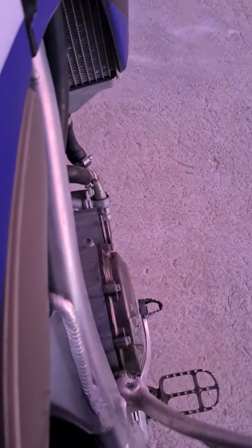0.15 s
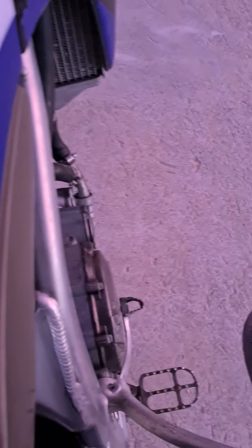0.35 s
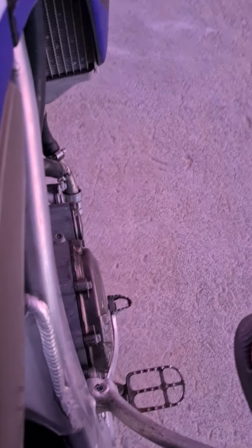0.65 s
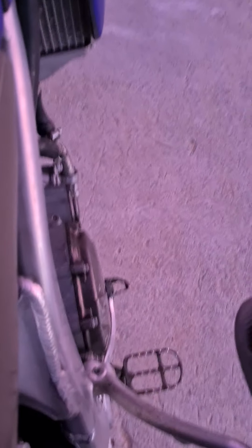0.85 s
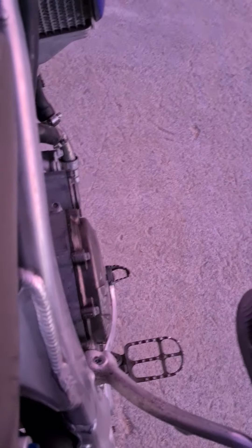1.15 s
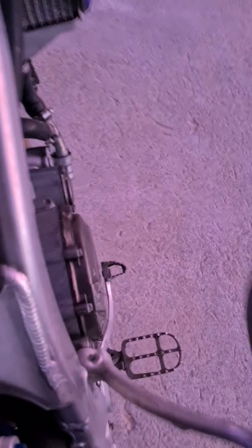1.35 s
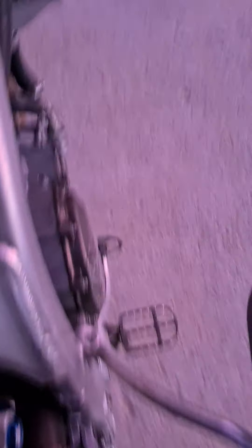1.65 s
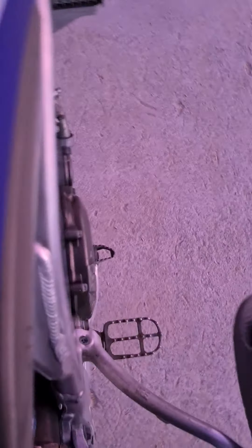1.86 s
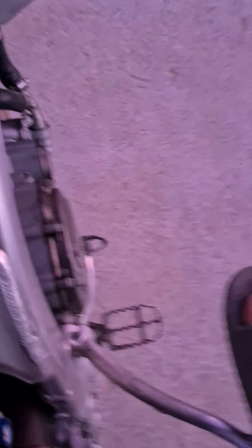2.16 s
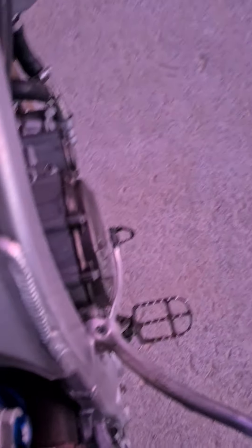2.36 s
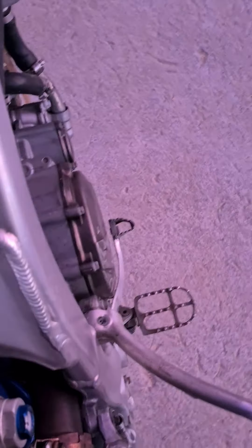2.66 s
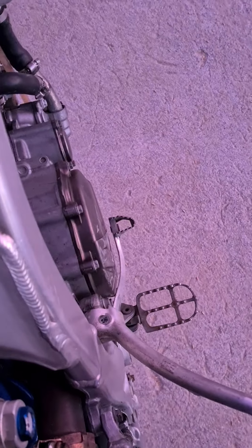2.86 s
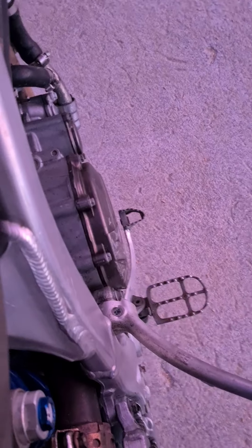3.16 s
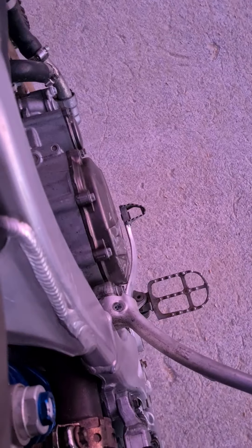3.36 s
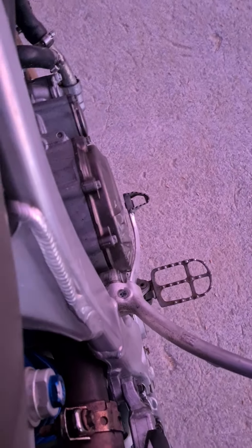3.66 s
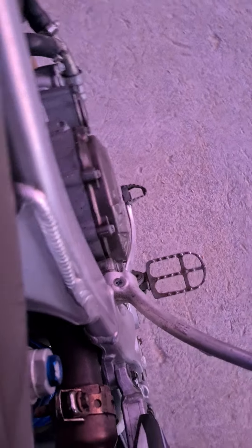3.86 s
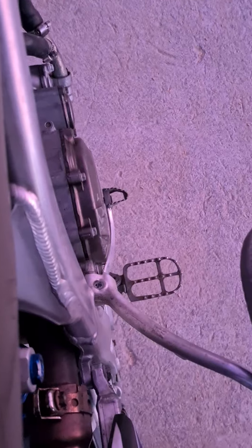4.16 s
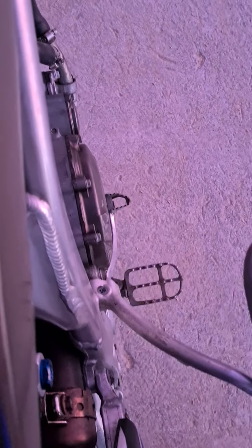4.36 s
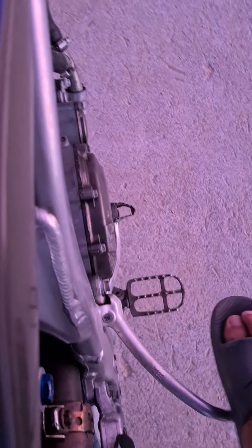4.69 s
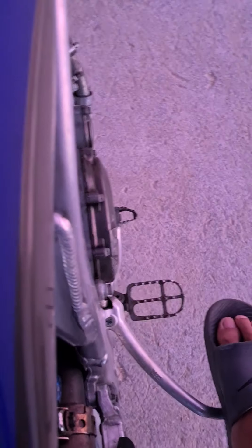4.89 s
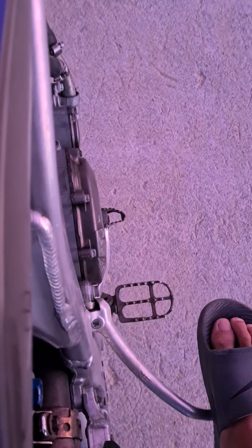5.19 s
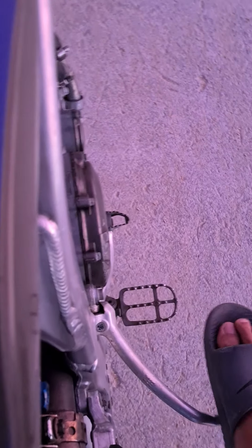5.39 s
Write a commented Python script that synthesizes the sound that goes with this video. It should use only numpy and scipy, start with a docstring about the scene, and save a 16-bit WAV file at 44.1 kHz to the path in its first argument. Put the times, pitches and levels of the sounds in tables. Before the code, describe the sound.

A parked motorcycle's kick-start lever is worked by foot in a quiet concrete yard, its own engine off. At once two very loud, bright metal clacks snap at 0.04 and 0.12 s with tiny squeaks and sharp scraping, then a duller knock with a short thud at 0.23. Faint ticks and a soft scuff run from 0.65 to 1.0. At 1.32 a strong clack lands, with a low thump near 1.4, and gritty dragging and small knocks continue until 1.9. Light rattles come around 2.3, then near quiet. A crisp tick at 3.68 and a short rattle at 3.76 follow. From 4.44 to 4.85 the sole drags dully with a faint lower squeak. Small ticks lead to a squeaky scrape and a hard, bright clack at 5.51. Contacts are dry, close and mostly right of centre; soft distant traffic, thin high insect hiss and a barely audible far engine stay underneath.

```python
"""A foot works the kick-start lever of a parked motorcycle in a concrete yard, its engine off.
Lever pivot and ratchet clack: bursts of tiny touches ring the modes of the cast metal. The sandal scuffs
and drags as filtered random grains, the pivot squeaks as gliding tones, and the frame thuds as damped swings.
Far off, filtered noise makes traffic, insects at one high pitch, a narrow hiss and an idling engine.
The machine stands to the right of two spaced microphones."""
import sys
import numpy as np
from scipy import signal
from scipy.fft import rfft, irfft, next_fast_len
from scipy.io import wavfile
from scipy.ndimage import uniform_filter1d

SR = 44100
rng = np.random.default_rng(int(sys.argv[2]) if len(sys.argv) > 2 else 0)


def int16_out(signal):
    """Quantize to a 16-bit WAV file."""
    q = np.round(np.clip(np.atleast_2d(signal).T, -1, 1) * 32767)
    wavfile.write(sys.argv[1], SR, q.astype(np.int16))


N = 243873   # length in samples


def from_db(db):
    """Turn decibels into a gain."""
    return 10 ** (np.asarray(db) / 20)


def rms_one(x):
    """Scale a sound to an rms of 1."""
    return x / np.sqrt(np.mean(x ** 2) + 1e-20)


def at_hz(points, hz):
    """Read a table between its rows, along a logarithmic pitch axis."""
    table_hz, values = np.transpose(points)
    return np.interp(np.log(hz), np.log(table_hz), values)


def drift(rate_hz):
    """Slow random wandering with a spread of 1: smoothed noise, made at every 40th sample."""
    step = 40
    pole = np.exp(-2 * np.pi * rate_hz * step / SR)
    noise = rng.standard_normal(N // step + 2002)
    slow = signal.lfilter([1], [1, -2 * pole, pole * pole], noise)[2000:]   # drop the settling-in
    return np.interp(np.arange(N) / step, np.arange(len(slow)), rms_one(slow))


def grains(per_s, spread_db):
    """Four unrelated streams of random contacts of uneven size."""
    shape = (2, 2, N)
    sizes = from_db(spread_db * np.minimum(rng.exponential(1, shape), 5))
    signs = rng.choice([-1, 1], shape)
    present = rng.random(shape) < per_s / SR
    return sizes * signs * present + 1e-9


def banded(white, spectrum, likeness, patchy_db, patch_rate):
    """Stereo noise in third-octave bands, each with its own level, flicker and likeness; mid rms 1."""
    lowest, highest = spectrum[0][0], spectrum[-1][0]
    bands = round(3 * np.log2(highest / lowest))
    edges = np.geomspace(lowest, min(highest, 17000), bands + 1)
    out, together = 0, drift(patch_rate / 2)   # flicker shared by all bands
    for k, (low, high) in enumerate(zip(edges, edges[1:])):
        band = signal.butter(2, [low, high], "band", fs=SR, output="sos")
        mid, side = signal.sosfilt(band, white[k % 2])   # neighbouring bands use unrelated noise
        hz = np.sqrt(low * high)
        alike = np.clip(at_hz(likeness, hz), -1, 1)
        gain = from_db(at_hz(spectrum, hz) + patchy_db * (together + drift(patch_rate)))
        out = out + gain * (np.sqrt(1 + alike) * mid + np.sqrt(1 - alike) * side * [[1], [-1]])
    return out / np.sqrt(np.mean(out.mean(axis=0) ** 2))


def to_the_right(x, left_db):
    """Sound reaches the farther left microphone later; left_db is its level minus the right one's."""
    lag = int(0.00018 * SR)   # seconds, cut down to whole samples
    left = np.r_[np.zeros(lag), x[0, :N - lag]]
    return np.array([from_db(left_db / 2) * left, from_db(-left_db / 2) * x[1]])


# Spectrum of traffic and air. Each row: pitch in Hz, relative level in dB per Hz.
YARD_SPECTRUM = [(12, -45.5), (20, -13), (41, -6), (71, 5), (121, -0.5), (230, -17.5), (296, -15),
                 (548, -35.5), (1020, -30), (1550, -23.5), (5320, -47.5), (7670, -68), (8820, -60.5),
                 (15000, -53), (16400, -70)]
# How alike the yard sounds left and right. Each row: pitch in Hz, likeness from 0 to 1.
YARD_LIKENESS = [(60, 0.96), (180, 1), (550, 0.69), (1650, 0.07), (4970, 0.46), (15000, 0)]


def yard():
    """Distant traffic and open air: wide noise whose bands swell and sink slowly."""
    noise = rng.standard_normal((2, 2, N))
    air = banded(noise, YARD_SPECTRUM, YARD_LIKENESS, patchy_db=2.0, patch_rate=2.85)
    return from_db(-43.5) * air * from_db([[-.8], [.8]])   # a little louder on the right


def narrow_hiss(centre_hz, width_hz, level_db, flutter_db):
    """Far noise in one narrow band, wavering slowly and fluttering faster around its level."""
    edges = [centre_hz - width_hz / 2, centre_hz + width_hz / 2]
    band = signal.butter(2, edges, "band", fs=SR, output="sos")
    gain = from_db(level_db + drift(3.8) + flutter_db * drift(11))
    return gain * rms_one(signal.sosfilt(band, rng.standard_normal((2, N))))


def insects():
    """A far chorus heard as a narrow hiss at one high pitch."""
    return narrow_hiss(centre_hz=7610, width_hz=540, level_db=-70.5, flutter_db=0.4)


def far_engine():
    """A far engine idles: each firing lets out a short, faint puff of mid-band noise."""
    period_s, offset_s = 0.086, 0.076
    since = (np.arange(N) / SR - offset_s) % period_s   # seconds since the last firing
    puffs = (1 - np.exp(-since / 0.0064)) * np.exp(-since / 0.0084) * from_db(2 * drift(6))
    band = signal.butter(3, [2200, 6000], "band", fs=SR, output="sos")
    noise = signal.sosfilt(band, rng.standard_normal((2, N)))
    return from_db(-74.5) * rms_one(puffs * noise)


def far_whine():
    """A faint narrow hiss in the distance that flutters strongly."""
    return narrow_hiss(centre_hz=1628, width_hz=200, level_db=-72.5, flutter_db=6.5)


# Ringing modes of the cast housing and lever, played by the rubbing and the clacks.
# Each row: pitch in Hz, level in dB (clacks only), basic time to die away by 60 dB in seconds.
METAL_MODES = [(276.4, -5.5, 0.0112), (428.5, -13.5, 0.068), (659.3, 0, 0.027), (1082, -2, 0.017),
               (1277, -11.5, 0.063), (1475, 1, 0.016), (1890, 1, 0.0098), (2133, -7, 0.05),
               (2424, -9, 0.049), (2757, -2.5, 0.016), (3160, -5.5, 0.019), (3630, 1, 0.0041),
               (4247, -9, 0.019), (4625, -8.5, 0.035), (5326, -11.5, 0.0071), (6010, -3, 0.0059),
               (6730, -5, 0.0095), (7310, -7, 0.0064), (7610, -9.5, 0.024), (9100, -15.5, 0.036),
               (9930, -20, 0.014), (11400, -15, 0.0072), (12240, -20, 0.024), (14190, -12.5, 0.0087)]


def through_metal(x):
    """The rubbed lever colours the grit with its own modes, all equally strong, with random signs."""
    size = next_fast_len(N)
    f, body = np.fft.rfftfreq(size, 1 / SR), 0
    for hz, _, t60 in METAL_MODES:
        decay_s = t60 / np.log(1000)
        body = body + rng.choice([-1, 1]) / (1 + 1j * (f - hz) * 2 * np.pi * decay_s)
    return irfft(rfft(x, size) * (.5 + body), size)[..., :N]   # .5 is the uncoloured part


# The sole resting on grit: levels in dB of grind, dull rasp, sharp rasp and hiss.
REST_DB = [-62, -67.5, -72.5, -88.5]
# Short slides of lever and sole. Each row: loudest moment in seconds, rise in seconds, fall in seconds
# (each for 20 dB), then the levels in dB of dull rasp, sharp rasp and hiss.
SCUFFS = [(0.031, 0.049, 0.059, -72, -33, -53), (0.06, 0.025, 0.017, -36.5, -44, -52),
          (0.111, 0.041, 0.051, -66, -34, -53.5), (0.148, 0.077, 0.16, -41.5, -62, -61.5),
          (0.218, 0.022, 0.037, -62, -39.5, -59), (0.79, 0.23, .15, -48.5, -71.5, -76.5),
          (0.989, 0.041, 0.038, -72.5, -52.5, -93), (1.272, 0.042, 0.097, -49.5, -45.5, -65),
          (2.236, 0.099, 0.11, -52.5, -48, -61.5), (2.305, 0.039, 0.063, -65, -57, -66),
          (2.43, 0.14, 0.27, -77, -73, -75), (3.579, 0.32, 0.21, -75, -63.5, -73.5),
          (3.663, 0.02, 0.041, -71, -47.5, -63), (3.78, 0.037, 0.042, -47.5, -56, -62),
          (5.431, 0.022, 0.16, -46.5, -51, -66), (5.498, 0.037, 0.056, -68, -43, -54),
          (5.523, 0.025, 0.021, -33, -50, -54)]
# Two long drags of the sole along the lever, each a list of points.
# Each row: time in seconds, then the levels in dB of dull rasp, sharp rasp and hiss.
DRAGS = [
    [(1.3, -53, -64, -73), (1.34, -43, -49, -66), (1.394, -38, -51, -49.5), (1.45, -44, -47, -61.5),
     (1.53, -60, -49, -60), (1.575, -56, -60, -64.5), (1.65, -48.5, -51, -60), (1.71, -55.5, -56, -76),
     (1.75, -55, -59, -61), (1.81, -56, -76, -71), (1.93, -69, -79, -93)],
    [(4.44, -63, -72, -86), (4.505, -48, -60, -58), (4.57, -46.5, -86, -80), (4.6, -46, -87, -67.5),
     (4.69, -43.5, -71, -51.5), (4.747, -42.5, -65, -58), (4.775, -53.5, -84, -80), (4.81, -46, -77, -78.5),
     (4.845, -68.5, -64, -79)],
]
# Grind compared with dull rasp: one value in dB for each drag.
DRAG_GRIND_DB = [1, 5]


def rub_levels():
    """Gains of grind, dull rasp, sharp rasp and hiss: rest, slides and drags add in power."""
    t = np.arange(0, N / SR, .001)
    power = from_db(REST_DB)[:, None] ** 2 * np.ones(len(t))
    for s, rise_s, fall_s, dull_db, sharp_db, hiss_db in SCUFFS:
        fade_db = -20 * np.where(t < s, (s - t) / max(rise_s, .005), (t - s) / max(fall_s, .005))
        grind_db = dull_db - 5.5   # coarse grit under a slide
        levels_db = np.array([[grind_db], [dull_db], [sharp_db], [hiss_db]])
        power += from_db(levels_db + fade_db) ** 2
    for rows, grind_db in zip(DRAGS, DRAG_GRIND_DB):
        s, *levels = np.transpose(rows)
        dull, sharp, hiss = [np.interp(t, s, level, left=-200, right=-200) for level in levels]
        power += from_db([dull + grind_db, dull, sharp, hiss]) ** 2
    return [np.interp(np.arange(N) / SR, t, np.sqrt(p)) for p in power]


# Spectra of coarse grind, of rasp (before its two halves are levelled) and of fine hiss.
# Each row: pitch in Hz, relative level in dB per Hz.
GRIND_SPECTRUM = [(120, 1.5), (200, -0.5), (300, -1.5), (500, -10), (800, -11)]
RASP_SPECTRUM = [(450, -21), (650, -3.5), (1000, -5), (1500, -3), (2200, -3.5), (3200, -5.5), (4500, -13.5),
                 (6500, -18), (8500, -50)]
HISS_SPECTRUM = [(2940, -33), (5000, -5.5), (6930, 6), (7760, -2.5), (11000, 1), (14000, 5), (15700, -5.5),
                 (16300, -16)]
# How alike the rubbing sounds left and right. Each row: pitch in Hz, likeness from 0 to 1.
RUB_LIKENESS = [(200, 0.74), (800, 0.65), (3000, 0.11), (12000, 0.085)]


def rubbing():
    """Grit under the sole: coarse grains grind, finer ones rasp on the lever, the finest hiss."""
    grind_gain, dull_gain, sharp_gain, hiss_gain = rub_levels()
    coarse = grains(700, spread_db=3.0)
    grind = banded(coarse, GRIND_SPECTRUM, RUB_LIKENESS, patchy_db=.8, patch_rate=15)
    finer = through_metal(grains(3000, spread_db=3.2))
    rasp = banded(finer, RASP_SPECTRUM, RUB_LIKENESS, patchy_db=1.1, patch_rate=14)
    rasp *= from_db(1.9 * drift(45))   # the sole sticks and slips
    finest = grains(15000, spread_db=1.5)
    hiss = banded(finest, HISS_SPECTRUM, RUB_LIKENESS, patchy_db=.8, patch_rate=25)
    # split the rasp at 2300 Hz into a dull and a sharp half
    dull = rms_one(signal.sosfilt(signal.butter(2, 2300, "low", fs=SR, output="sos"), rasp))
    sharp = rms_one(signal.sosfilt(signal.butter(2, 2300, "high", fs=SR, output="sos"), rasp))
    # the two halves are opposite in sign where they meet, so they are subtracted
    rasp = dull_gain * dull - sharp_gain * sharp
    return (to_the_right(grind_gain * grind, -2.5) + to_the_right(rasp, -5.5)
            + to_the_right(hiss_gain * hiss, -5.5))


# The dry pivot squeaks as the lever turns. Each row: start in seconds, length in seconds,
# first slip rate in Hz, last slip rate in Hz, level in dB at the loudest point before wobble and panning.
SQUEAKS = [(0.0, 0.035, 2700, 2310, -34), (0.045, .016, 2385, 2440, -25), (0.09, .022, 2410, 2330, -33.5),
           (4.62, 0.027, 1370, 1280, -41), (4.648, .085, 1300, 1216, -43), (5.392, .037, 2030, 2100, -47),
           (5.44, 0.025, 2380, 2340, -35), (5.469, 0.026, 2340, 2300, -38)]


def squeaks():
    """Stick-slip at an unsteady, gliding rate: a rough line and its octave that swell and fade."""
    out = np.zeros(N)
    for s, length_s, first_hz, last_hz, peak_db in SQUEAKS:
        share = np.linspace(0, 1, round(length_s * SR))   # how much of the squeak has passed
        wobble = uniform_filter1d(rng.standard_normal((2, 4000)), size=40) * np.sqrt(40)
        rate_wobble, level_wobble = wobble[:, :len(share)]
        slip_hz = (first_hz + (last_hz - first_hz) * share) * (1 + 0.058 * rate_wobble)
        phase = 2 * np.pi * np.cumsum(slip_hz) / SR
        arch_db = np.interp(share, [0, .75, 1], [-8, 0, -8])   # loudest three quarters through
        swell = signal.windows.tukey(len(share), .4) * from_db(peak_db + arch_db + 0.84 * level_wobble)
        out[round(s * SR):][:len(share)] += swell * (np.sin(phase) + 0.2 * np.sin(2 * phase))
    return to_the_right(np.array([out, out]), -12.5)


LEAD, SIZE = 900, 8192   # samples before the main blow; samples in one whole clack


def touches(chatter_ms):
    """Each row is one contact: the parts slide together, hit, and rattle out in random touches."""
    ms = 1000 * np.arange(-LEAD, 2 * LEAD) / SR
    slide = 0.38 * np.exp(ms / np.clip(0.94 * chatter_ms, .3, 9))
    rattle = np.exp(-ms / np.clip(chatter_ms, .3, 12))
    shape = np.where(ms < 0, slide, rattle)
    push = shape * rng.standard_normal(shape.shape) * (rng.random(shape.shape) < .4)
    push[:, LEAD] += 15.2 / chatter_ms[:, 0]   # the main blow, lost in a long rattle
    return push


# Metal contacts. Each row: time in seconds, peak level in dB, lift of the low modes in dB,
# lift of the treble modes in dB, favoured ring in Hz, chatter fade in ms (limited inside touches),
# left minus right in dB.
CLACKS = [(0.041, 2, -18.5, 10, 4390, 2.6, -8), (0.12, 1.4, -24.5, 8, 3090, 3.2, -4.5),
          (0.175, -30, 4, 1, 1000, 2.7, -9), (0.228, -10, -4, -28.5, 3130, 4.1, -9),
          (0.651, -36.5, -9, -5, 2650, 3.7, -4.5), (0.717, -37, -14, -10, 2660, 13, -9),
          (0.857, -36, -16, -32, 3030, 4.9, -12), (0.872, -29.5, -7, -21, 2760, 19, -3.5),
          (1.005, -40, -10, -39, 4640, 5.4, -9.5), (1.262, -31.5, -16, -9, 1890, 15, -16),
          (1.288, -26.5, -7, -38, 3210, 4.3, -3), (1.32, -4.5, -6.5, -15, 2990, 3.6, -6),
          (1.431, -22, 1, -6, 1760, 1.4, 16), (1.557, -29, -6, -31, 1230, 3.7, -7),
          (1.615, -30.5, 2, -31, 1070, 11, -4), (1.688, -23, -4, -30, 1060, 3.2, -11),
          (1.699, -22, 6, 1, 1040, 11.7, -4.5), (1.805, -32, 19, -7, 840, 2.9, -4),
          (1.824, -32.5, 16, -39, 1070, 2.6, -6), (1.861, -23.5, 0, -52.5, 2170, 14, -8),
          (1.888, -24, 3.5, -47, 1245, 10.7, -7), (2.243, -35, -38, -7, 2130, 18, -10),
          (2.298, -36.5, -26, -7, 5940, 6.7, -6), (2.319, -40, -7, 3, 907, 9.7, -6),
          (2.336, -37, -30, -4, 5800, 2.5, -9), (2.424, -40, -36, -4.5, 2540, 5.2, -6),
          (3.205, -38.5, -5, -22, 560, 3.8, -1.5), (3.664, -30.5, -32, -3, 2150, 9.6, -9),
          (3.681, -17, -46, -13.5, 3060, 2.7, -5.5), (3.746, -26.5, -4.5, 1, 2930, 14, -5),
          (3.764, -16.5, -9.5, -8, 2700, 7.3, -6.5), (3.816, -31.5, 1.5, 3.5, 1070, 11, -6),
          (3.926, -39, -5, -26, 1115, 4.0, -10), (4.438, -37, -8.5, -18, 1110, 5.4, -5.0),
          (4.497, -37.5, 20, 9, 810, 12, -11), (4.775, -25.5, 3.5, -51, 2630, 12, -8),
          (4.797, -30, 3, -51, 2710, 5.2, -15), (4.827, -28, -27, -37, 4100, 3.3, -7),
          (5.15, -35.5, -13, -49.5, 3390, 3, -7), (5.343, -36, -1.5, -45, 1840, 7.2, -1.5),
          (5.437, -22, -15, -35, 2390, 2.8, -9), (5.507, -0.5, -25.5, 7.5, 2820, 3.4, -6.5),
          (5.511, -14.5, -2, -11, 2000, 3.4, -6)]


def clacks():
    """Contacts strike every metal mode, a little differently each time and at each microphone."""
    s, peak_db, body_db, treble_db, best_hz, chatter_ms, pan_db = np.transpose(CLACKS)[:, :, None]
    push = rfft(touches(chatter_ms), SIZE)
    push /= np.sqrt(uniform_filter1d(abs(push) ** 2, size=120))   # a rattle drives all modes about evenly
    luck = rng.standard_normal((len(s), len(METAL_MODES), 2, 4))
    f = np.arange(SIZE // 2 + 1) * SR / SIZE
    body = np.zeros((2, len(s), len(f)), complex)
    ring_lift_db = 9.5   # the mode nearest the blow stands out by this much
    for m, (mode_hz, level_db, t60) in enumerate(METAL_MODES):
        low = np.clip(np.log2(2236 / mode_hz), 0, 1)   # modes below 2236 Hz count more and more as body
        high = np.clip(np.log2(mode_hz / np.clip(1.54 * best_hz, 2500, 5500)), 0, 1)
        near = np.exp(-(np.log2(mode_hz / best_hz) / .15) ** 2)   # where the blow lands picks a mode
        level = level_db + low * body_db + high * treble_db + near * ring_lift_db
        ring_s = t60 * (1 + .03 * near * ring_lift_db)   # the favoured mode rings longer
        for twin in range(2):   # each mode is a close pair, detuned a little at random for every clack
            pitch_luck, left_luck, right_luck, phase_luck = luck[:, m, twin].T[:, :, None]
            hz = mode_hz + .7 * near * (best_hz - mode_hz) + .025 * mode_hz * pitch_luck
            damping_hz = np.log(1000) / (2 * np.pi * ring_s)
            line = SR / (2 * np.pi) / (damping_hz + 1j * (f - hz))
            line = line / (1 + ((f - hz) / (.45 * hz)) ** 2)   # little is radiated far from the mode
            turn = np.exp(1j * min(mode_hz / 2500, 1.2) * phase_luck)   # phase differs more in the treble
            body[0] += line * from_db(level + pan_db / 2 + 2 * left_luck) * turn
            body[1] += line * from_db(level - pan_db / 2 + 2 * right_luck)
    hits = irfft(push * body, SIZE)
    hits *= from_db(peak_db) / abs(hits).max(axis=2).mean(axis=0)[:, None]
    out = np.zeros((2, N + LEAD + SIZE))
    for k, start in enumerate(np.round(s[:, 0] * SR).astype(int)):
        out[:, start:start + SIZE] += hits[:, k]
    return to_the_right(out[:, LEAD:N + LEAD], 0)   # the level difference is already in body


# Weight landing on frame and ground. Each row: start in seconds, strength in dB before
# damping and panning, pitch in Hz, time to die away by 60 dB in seconds.
THUDS = [(0.229, -14, 620, 0.051), (0.232, -16.5, 248, 0.067), (1.225, -20, 87.6, 0.063),
         (1.381, -18, 277, 0.078), (1.409, -5.5, 93, 0.045), (1.433, -19, 55, 0.096),
         (1.696, -21.5, 70.5, 0.2), (1.721, -24.5, 53.7, 0.29), (1.862, -34, 75.6, 0.44),
         (1.9, -33.5, 58.7, 0.17), (3.927, -53, 102, 0.12)]


def thuds():
    """A soft push sets one low, damped swing going."""
    out, t = np.zeros(N + 20000), np.arange(20000) / SR
    for s, strength_db, hz, t60 in THUDS:
        soft_start = 1 - np.exp(-t / 0.01)
        fade = from_db(strength_db - 60 * t / max(t60, .02))
        out[round(s * SR):][:len(t)] += np.sin(2 * np.pi * hz * t) * soft_start * fade
    return to_the_right(np.array([out[:N], out[:N]]), -8.0)


def scene():
    """Everything at the two microphones."""
    distance = yard() + insects() + far_engine() + far_whine()
    return clacks() + squeaks() + thuds() + rubbing() + distance


def record(dry):
    """The loudest peaks are rounded just below full scale, then the top above 16.6 kHz is cut."""
    rounded = dry / (1 + (dry / .97) ** 6) ** (1 / 6)
    return signal.sosfilt(signal.cheby2(14, 70, 16600, fs=SR, output="sos"), rounded)


dry = scene()
out = record(dry)
int16_out(out)
```